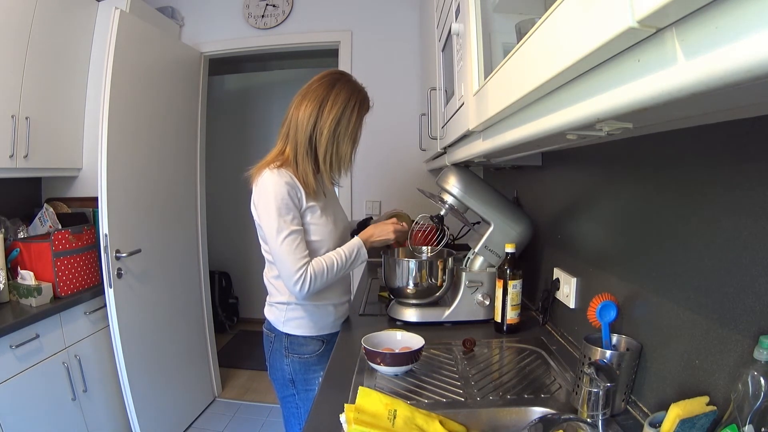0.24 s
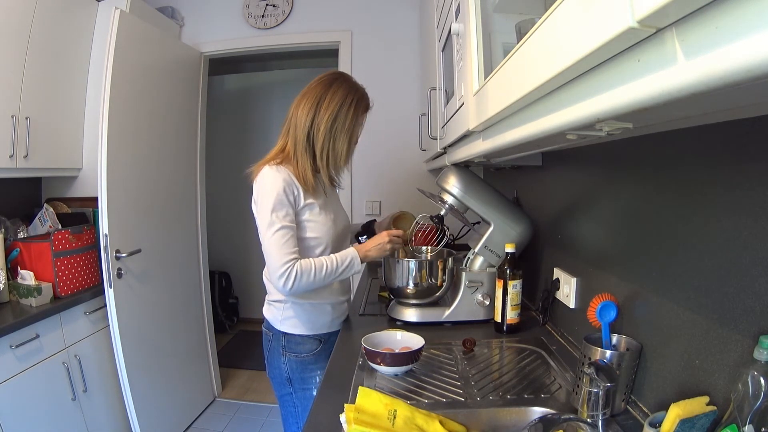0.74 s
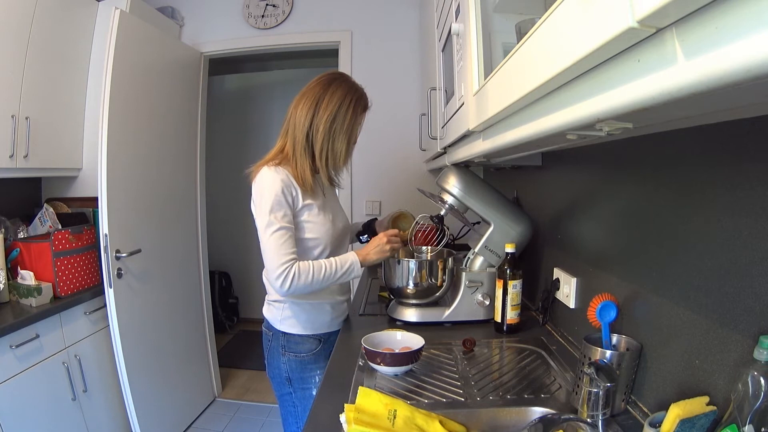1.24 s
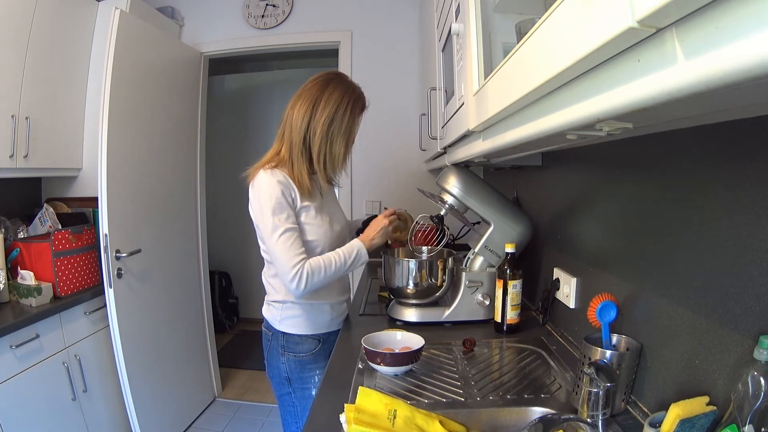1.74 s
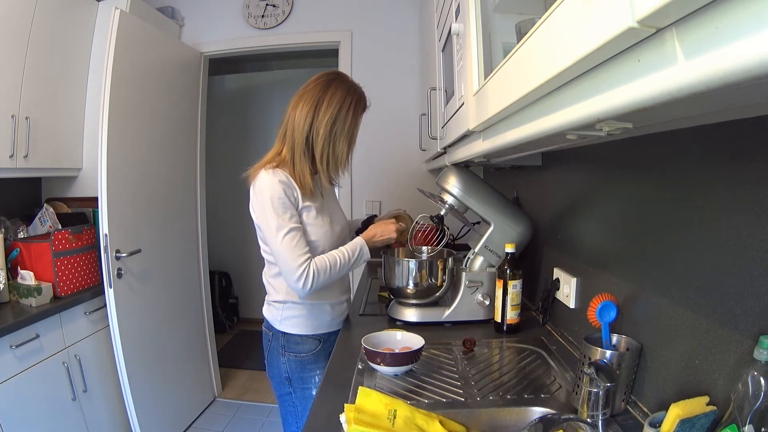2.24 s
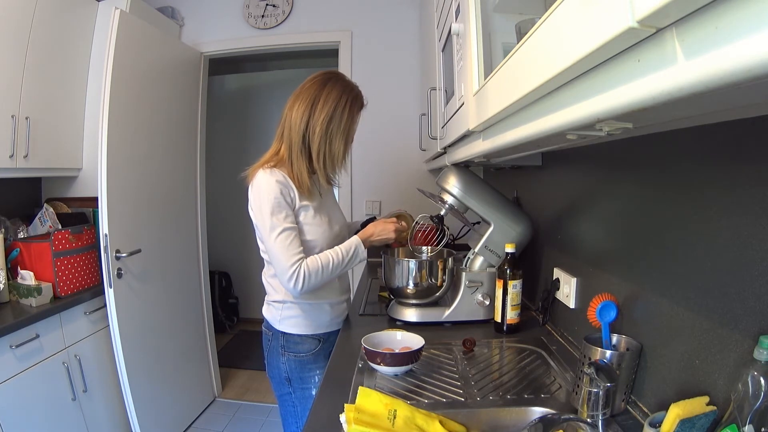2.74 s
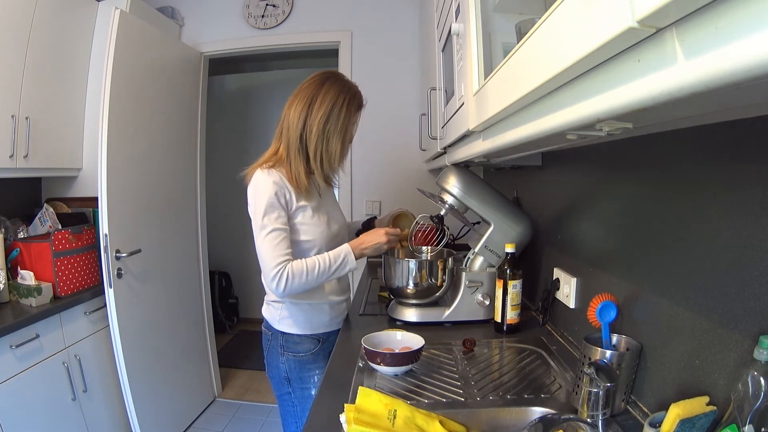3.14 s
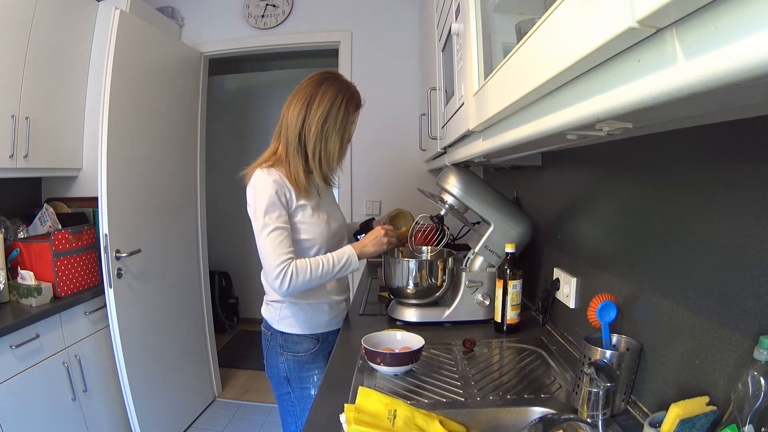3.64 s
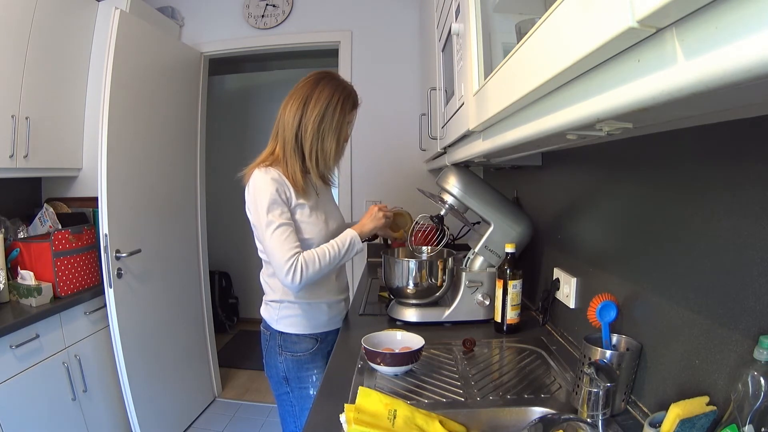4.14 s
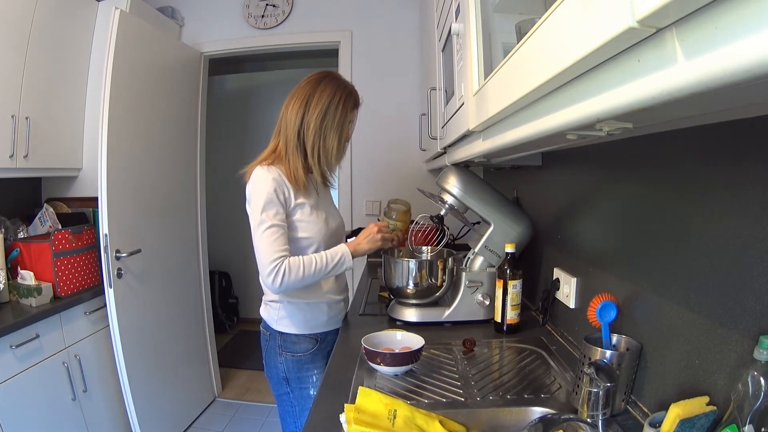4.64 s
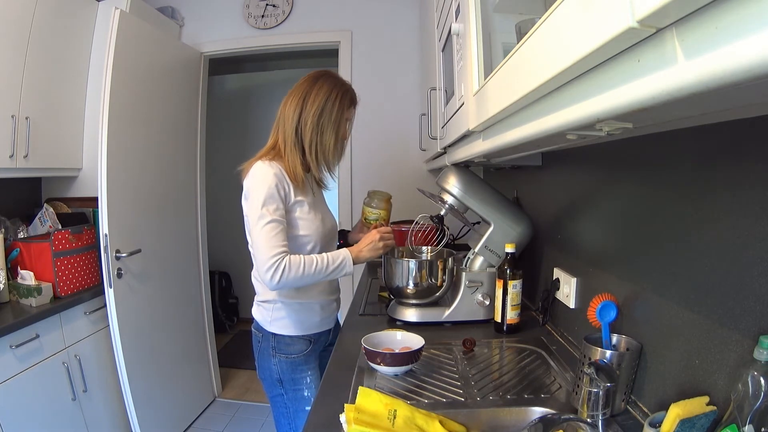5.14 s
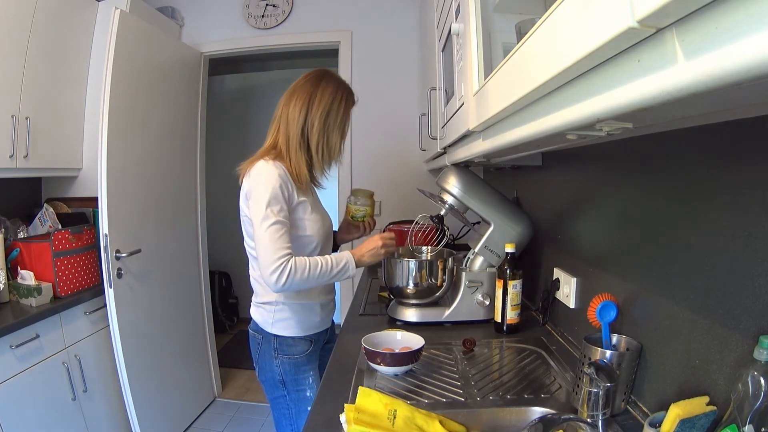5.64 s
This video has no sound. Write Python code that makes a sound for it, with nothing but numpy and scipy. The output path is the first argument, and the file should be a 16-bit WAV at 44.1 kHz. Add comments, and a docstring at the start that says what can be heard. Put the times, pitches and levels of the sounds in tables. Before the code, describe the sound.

In a small, hard-walled kitchen, wet food smacks softly into a bowl and a steel spoon lightly touches a glass jar. The spoon clinks twice, bright and ringing, then after a pause knocks hard and briefly scrapes the glass. A soft footstep and a rustle of clothes come at the end. The spoon is close to the stereo microphone, while a wall clock ticks faintly over low hum and hiss.

```python
"""A steel spoon scoops food from a glass jar into a steel bowl, close to a stereo microphone.
It touches the glass once, clinks twice, knocks hard and scrapes; each contact rings the same modes.
The place is a small, hard-walled kitchen, with quick reflections off worktop and cupboards.
Farther off a wall clock ticks and the mains hum; at the end the cook shifts her weight with a rustle."""
import sys
import numpy as np
from scipy import signal
from scipy.fft import rfft, irfft
from scipy.io import wavfile
from scipy.ndimage import uniform_filter1d

SR = 44100
rng = np.random.default_rng(int(sys.argv[2]) if len(sys.argv) > 2 else 0)


def to_wav(s):
    """Save 16-bit WAV."""
    ch = np.atleast_2d(s).T  # columns
    pcm = np.round(np.clip(ch, -1, 1) * 32767)  # PCM
    wavfile.write(sys.argv[1], SR, pcm.astype(np.int16))


N = 259616
T = np.arange(N) / SR
RING_T = T[:32768]  # time axis of one short sound
LEFT_RIGHT = np.array([[1], [-1]])


def undb(db):
    """Decibels to gain."""
    return 10 ** (np.asarray(db) / 20)


def unit(x):
    """Scale to rms 1."""
    return x / np.sqrt(np.mean(x ** 2))


def burst(x, db):
    """Give a short sound the energy of a tenth of a second at this level."""
    return x * undb(db) / np.sqrt(np.sum(np.mean(x, axis=0) ** 2) * 10 / SR)


def fade(t60):
    """Exponential decay, 60 dB down after t60 seconds."""
    return np.exp(-np.log(1000) * RING_T / t60)


def envelope(t, start, attack_s, hold_s, release_t60, sag_db_per_s=0):
    """Attack, a hold that may sag, and release."""
    age = np.maximum(t - start, 0)
    released = np.maximum(age - attack_s - hold_s, 0)
    held = np.minimum(age / attack_s, 1) * undb(sag_db_per_s * age)
    return held * np.exp(-np.log(1000) * released / release_t60)


def colour(x, points):
    """Filter by a spectrum of (Hz, dB) points."""
    hz, db = np.transpose(points)
    f = np.fft.rfftfreq(x.shape[-1], 1 / SR)
    gain = undb(np.interp(np.log(f + 1), np.log(hz), db))
    return irfft(rfft(x) * gain, x.shape[-1])


def noise(points):
    """Steady noise with this spectrum, rms 1."""
    return unit(colour(rng.standard_normal(N), points))


def band(x, low_hz, high_hz, order):
    """Causal band-pass."""
    sos = signal.butter(order, [low_hz, min(high_hz, SR * 4 / 9)], "band", fs=SR, output="sos")
    return signal.sosfilt(sos, x)


def wander(turns_per_s):
    """Slow random drift, rms 1."""
    span = int(SR / turns_per_s)
    steps = np.repeat(rng.standard_normal(N // span + 1), span)
    return unit(uniform_filter1d(steps, span)[:N])


def mode(hz, t60):
    """One decaying resonance."""
    return np.sin(2 * np.pi * hz * RING_T) * fade(t60)


def crack(t60, rise_s=0.0024):
    """A dense cloud of small resonances that builds up and dies away."""
    return rng.standard_normal(len(RING_T)) * fade(t60) * (1 - np.exp(-RING_T / rise_s))


def add(out, start_s, x):
    """Mix a sound in at a time."""
    i = int(start_s * SR)
    out[:, i:i + x.shape[1]] += x[:, :max(N - i, 0)]


def kitchen(tail_db, early_db=6, early_side=0.29):
    """Path from one spot to the microphone: direct sound, worktop and cupboards, then the walls."""
    response = np.zeros((2, len(RING_T)))
    response[:, 0] = 1
    for t60, rise_s, db, side in (0.06, 0.00087, early_db, early_side), (0.33, 0.003, tail_db, 0.47):
        echoes = crack(t60) + side * LEFT_RIGHT * crack(t60)
        echoes *= 1 - np.exp(-RING_T / rise_s)
        response += echoes * undb(db) / np.sqrt(np.sum(echoes[0] ** 2))
    # the walls and the air swallow the top treble sooner
    treble = band(response, 6700, 17000, order=1)
    return response - treble * (1 - fade(0.3))


def at_mic(x, path):
    """A sound carried through the room to the microphone."""
    return signal.fftconvolve(x[None], path, axes=1)[:, :len(x)]


# Hiss and rumble all round the microphone. Each row: frequency in Hz, relative level in dB.
HISS_SPECTRUM = [(76, -31.5), (130, -1.5), (231, -1), (300, -3), (368, -4), (411, -6.5), (553, -6.5),
                 (596, -8), (745, -10.5), (802, -8.5), (2840, -18), (4270, -20), (4510, -21), (11000, -37),
                 (14300, -63.5), (22000, -120)]
RUMBLE_SPECTRUM = [(15, -13), (30, -1.5), (48, 4), (65, 3.5), (95, -4), (130, -7), (190, -25.5), (400, -44)]
# Stereo width of the hiss. Each row: frequency in Hz, side minus mid in dB.
HISS_WIDTH = [(60, -17.5), (110, 5.5), (190, -5.5), (340, 0.5), (610, 4), (1100, 4.5), (1960, 4.5),
              (3510, 1), (6270, -3.5), (11200, -4)]
# Mains hum, in the centre. Each row: frequency in Hz, level in dB.
HUM_LINES = [(49.1, -51.5), (73, -63.5), (97.5, -59.5), (588, -70.5)]


def room_tone(hiss_db=-58.5, rumble_db=-56, waver_rad=0.22):
    """The kitchen at rest: diffuse hiss, a low rumble and the wavering hum of an appliance."""
    hiss_gain = undb(hiss_db + 0.21 * wander(2.4))
    mid = noise(HISS_SPECTRUM)
    side = colour(noise(HISS_SPECTRUM), HISS_WIDTH)
    hum = np.zeros(N)
    for hz, db in HUM_LINES:
        peak = np.sqrt(2) * undb(db + wander(2.6))
        hum += peak * np.sin(2 * np.pi * hz * T + waver_rad * wander(11))
    return hiss_gain * (mid + LEFT_RIGHT * side) + hum + undb(rumble_db) * noise(RUMBLE_SPECTRUM)


# Soft, wet smacks at the worktop. Each row: start in seconds, band centre in Hz, level in dB.
FOOD_SMACKS = [(0.005, 825, -55), (0.036, 1310, -54.5), (0.185, 460, -55.5), (0.791, 7600, -77),
               (1.043, 8000, -83), (3.825, 7900, -79), (5.105, 984, -63.5), (5.453, 9500, -77.5),
               (5.674, 7600, -76)]


def food(t60=0.036, band_ratio=1.25):
    """Wet food lets go of the spoon and lands in the bowl, with plenty of room around it."""
    out = np.zeros((2, N))
    for start, hz, db in FOOD_SMACKS:
        smack = band(crack(t60), hz / band_ratio, hz * band_ratio, order=2)
        add(out, start, burst(at_mic(smack, kitchen(tail_db=8.5)), db))
    return out


def jar_mode(hz, t60, split_hz=26, twin_db=-6, contact_db=-2, contact_t60=0.035, band_ratio=1.13):
    """A glass mode and its beating twin; it dies fast at first, while the spoon is still on the jar."""
    offset_hz, twin = split_hz * rng.choice([-1, 1]), undb(twin_db)
    free = mode(hz - offset_hz * twin ** 2, t60) + twin * mode(hz + offset_hz, t60)
    damped = undb(contact_db) * mode(hz, contact_t60)
    # the wave needs a few cycles to spread round the wall, so the mode swells in without a click
    return band(free + damped, hz / band_ratio, hz * band_ratio, order=2)


# The jar with the spoon on it. Each row: frequency in Hz, t60 in seconds, then relative level in dB
# for the touch, the first clink, the second clink, the knock and the scrape.
JAR_MODES = [(464.3, 0.045, -19.5, -26.5, -25.5, -25.5, -16), (673, 0.15, -23, -23, -12, -18, -5.5),
             (1134, 0.0072, -24, -26, -22.5, -22, -30), (2060, 0.086, -16.5, -24, -24.5, -13, -26),
             (2223.4, 0.18, -8.5, -14.5, 0, -4.5, -13), (2265, 0.17, -2, -7.5, -10, -0.5, -1.5),
             (2318, 0.08, -6, -33, -29, -10, -1.5), (2555, 0.1, -18, -30.5, -10.5, -16, -18),
             (2924, 0.08, -14.5, -11.5, -23, -18.5, -32), (3177, 0.2, -38, -7.5, -0.5, -5.5, -6),
             (3303, 0.22, -23, -17, -6.5, -24, -33), (3620, 0.13, -38, -29, -36, -23, -12.5),
             (3920, 0.08, -28.5, -15.5, -28, -9.5, -16), (4093, 0.091, -32, -3.5, -36, -19.5, -26),
             (4107, 0.08, -23, -15, -8.5, -18.5, -24), (4393, 0.099, -38, -36.5, -7.5, -9, -17.5),
             (4850, 0.08, -19.5, -11.5, -26, -24.5, -29), (5260, 0.091, -29, -7, -5, -27, -12.5),
             (5420, 0.09, -16, -8, -25, -7.5, -10.5), (5790, 0.16, -20, -24, 0, -16.5, -14),
             (5850, 0.089, -39, -11, -4, -19.5, -18), (6080, 0.08, -38, -13, -26, -11, -28),
             (6470, 0.08, -22, -17.5, -11, -11.5, -21), (6520, 0.069, -33, -23, -30, -7.5, -30),
             (7100, 0.08, -18, -24.5, -31, -22, -28), (7294, 0.098, -16, -39, -17.5, -7, -16.5),
             (9090, 0.096, -32, -23, -16.5, -21, -22), (9280, 0.06, -24, -20, -11, -26.5, -35),
             (10840, 0.1, -27, -10, -18.5, -37, -28)]
# The touch, two clinks and the knock, close by. Each row: start in seconds, ring level in dB,
# crack level in dB, the crack's lower and upper edges in Hz, tick level in dB.
SPOON_BLOWS = [(0.1272, -39, -54.5, 2280, 7240, -59.5), (1.9113, -26.5, -39.5, 2620, 6520, -34.5),
               (2.1411, -32, -34.5, 2640, 5900, -42.5), (4.1023, -27, -26.5, 1820, 7230, -50.5)]


def spoon_clinks(crack_t60=0.012):
    """Steel on glass: each blow gives a hard crack, a bright tick and a ring set by where it lands."""
    out = np.zeros((2, N))
    for k, (start, ring_db, crack_db, low_hz, high_hz, tick_db) in enumerate(SPOON_BLOWS):
        # the ring spreads all round the room; the crack reaches the microphone more directly
        wide = kitchen(tail_db=7, early_db=3)
        near = kitchen(tail_db=1, early_db=4.5, early_side=0.27)
        for hz, t60, *place_db in JAR_MODES:
            add(out, start, burst(at_mic(jar_mode(hz, t60), wide), ring_db + place_db[k]))
        impact = band(crack(crack_t60), low_hz, high_hz, order=6)
        tick = band(crack(crack_t60), 4300, 12000, order=3)
        add(out, start, burst(at_mic(impact, near), crack_db))
        add(out, start, burst(at_mic(tick, near), tick_db))
    return out


# The clock's plastic case, off on the wall. Each row: frequency in Hz, t60 in seconds, relative dB.
CASE_MODES = [(839.5, 0.041, -0.5), (1051, 0.009, -7), (1407, .02, -4.5), (1944, 0.02, -9)]


def wall_clock(first_s=0.873, tock_lag_s=0.011, tick_db=-59.5, rebound_s=0.015, rebound_db=-60.5):
    """Once a second the movement steps and drops into place, ringing the case."""
    out = np.zeros((2, N))
    ring = sum(undb(db) * mode(hz, t60) for hz, t60, db in CASE_MODES)
    click = undb(-7) * band(crack(t60=0.026), 700, 4000, order=2)
    for k, beat in enumerate(np.arange(first_s, T[-1] - tock_lag_s, 1)):
        start = beat + k % 2 * tock_lag_s  # every other step comes a little late
        tick = at_mic(ring + click, kitchen(tail_db=1.5, early_db=5))
        add(out, start, burst(tick, tick_db))
        add(out, start + rebound_s, burst(tick, rebound_db))
    return out


# Rubbing on the glass and its gritty part. Each row: frequency in Hz, relative level in dB.
RUB_SPECTRUM = [(150, -17), (420, 1.5), (800, 2.5), (1500, 2), (2200, 10.5), (3300, -0.5), (5500, -4.5),
                (8000, -18.5), (11000, -42)]
GRIT_SPECTRUM = [(1500, -60), (3500, -24), (4700, -40), (5250, 14), (6300, 5), (7300, 12), (8000, 4.5),
                 (10000, 5), (11000, 13.5)]
# A graze, the long scrape and a light drag, close by.
# Each row: start in seconds, length in seconds, relative pressure in dB.
SPOON_STROKES = [(4.172, 0.02, -6.5), (4.273, 0.108, -2), (4.412, 0.036, -16.5)]


def spoon_scrape(ring_db=-36.5, rub_db=-38, grit_db=-38, slips_per_s=1200, attack_s=0.016):
    """The spoon's edge sticks and slips along the glass; the tiny slips keep the jar ringing."""
    start = SPOON_STROKES[0][0]
    t = start + RING_T
    pressure = sum(
        undb(db) * envelope(t, onset, attack_s, length - attack_s, release_t60=0.047, sag_db_per_s=-30)
        for onset, length, db in SPOON_STROKES)
    slipping = rng.random(len(t)) < slips_per_s / SR
    slips = slipping * rng.standard_normal(len(t)) * pressure
    path, out = kitchen(tail_db=3.5), np.zeros((2, N))
    drive = at_mic(slips, path)
    for hz, t60, *place_db in JAR_MODES:
        add(out, start, burst(at_mic(jar_mode(hz, t60), drive), ring_db + place_db[-1]))
    add(out, start, burst(colour(drive, RUB_SPECTRUM), rub_db))
    # the scrape turns gritty as the spoon crosses the rim of the jar
    rim_s, rim_width_s, rim_boost_db = 4.374, 0.021, 32
    over_rim = np.exp(-0.5 * ((t - rim_s) / rim_width_s) ** 2)
    grit = at_mic(slips * undb(rim_boost_db * over_rim), path)
    add(out, start, burst(colour(grit, GRIT_SPECTRUM), grit_db))
    return out


# The cook's rustle and footfall. Each row: frequency in Hz, relative level in dB.
RUSTLE_SPECTRUM = [(88, -30), (150, -9), (239, -6), (267, -19), (343, -3), (620, -7.5), (1060, -10.5),
                   (1470, -7.5), (2000, -10), (3240, -12), (11000, -43.5), (14300, -74), (22000, -120)]
FOOTFALL_SPECTRUM = [(20, -19), (42, 9), (75, -0.5), (110, -4.5), (170, -20), (400, -49)]
# Her sole and clothes, wide at the microphone. Each row: start in seconds, length in seconds, level in dB.
COOK_RUSTLES = [(5.662, 0.085, -58.5), (5.737, 0.13, -43.5), (5.865, 0.04, -48)]


def cook(step_db=-41, side=0.6, attack_s=0.021):
    """A soft footfall in the centre; sole and clothes rub as she turns."""
    step = undb(step_db) * envelope(T, start=5.685, attack_s=0.02, hold_s=0.028, release_t60=0.2)
    turn = sum(
        undb(db) * envelope(T, start, attack_s, length - attack_s, release_t60=0.1, sag_db_per_s=-63)
        for start, length, db in COOK_RUSTLES)
    rub = noise(RUSTLE_SPECTRUM) + side * LEFT_RIGHT * noise(RUSTLE_SPECTRUM)
    flutter = undb(0.93 * wander(100))
    return turn * rub * flutter + step * noise(FOOTFALL_SPECTRUM)


def scene():
    """From the microphone's spot: spoon and jar in front, the quieter sounds behind them."""
    return spoon_clinks() + spoon_scrape() + wall_clock() + food() + cook() + room_tone()


def record(dry):
    """The camera's microphone cuts the top octave."""
    top_hz = 11150
    return signal.sosfilt(signal.ellip(10, 0.2, 70, top_hz, fs=SR, output="sos"), dry)


dry = scene()
out = record(dry)
to_wav(out)
```